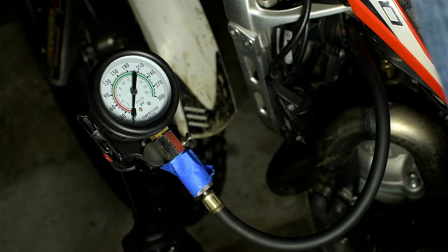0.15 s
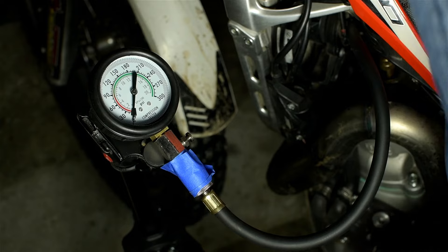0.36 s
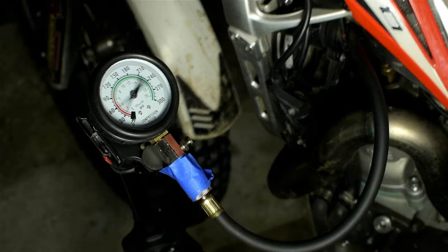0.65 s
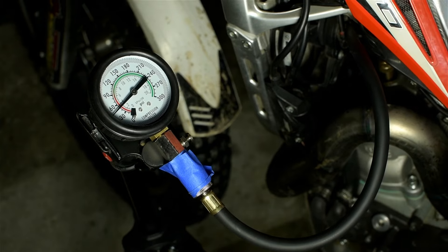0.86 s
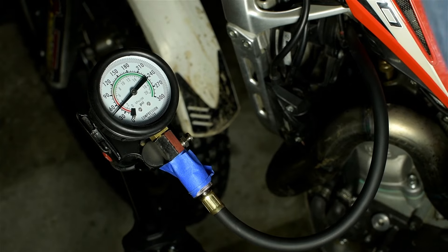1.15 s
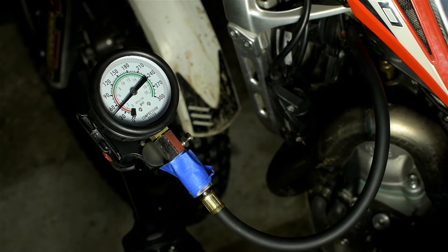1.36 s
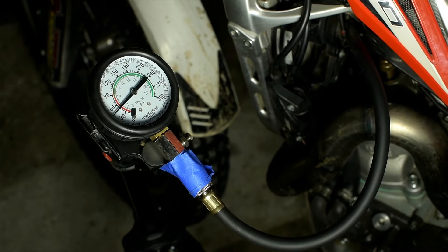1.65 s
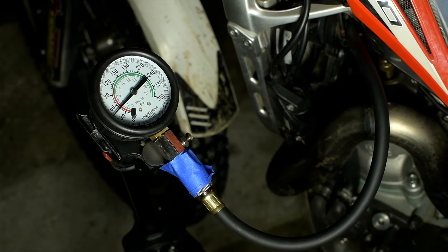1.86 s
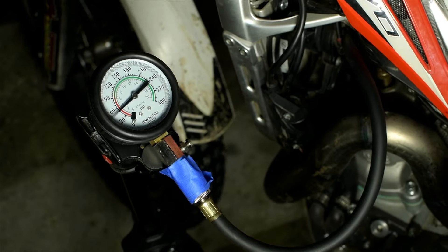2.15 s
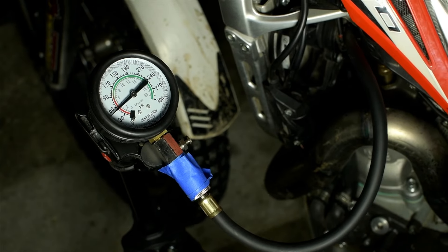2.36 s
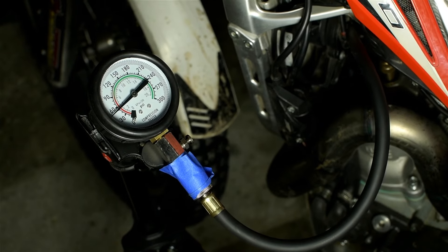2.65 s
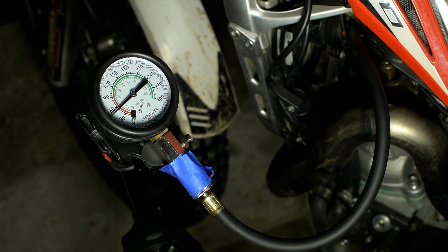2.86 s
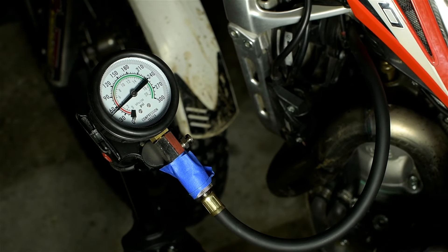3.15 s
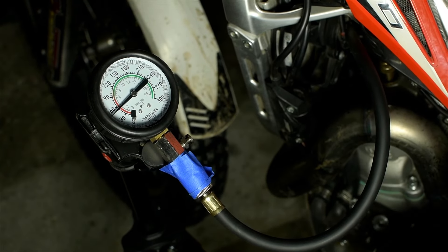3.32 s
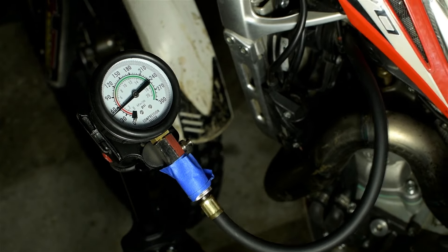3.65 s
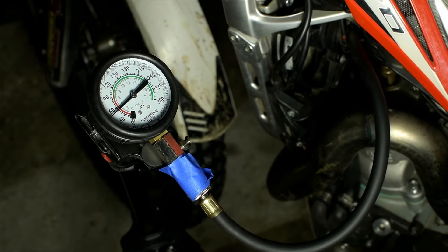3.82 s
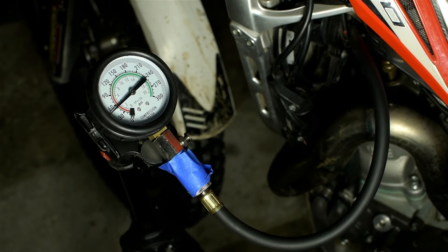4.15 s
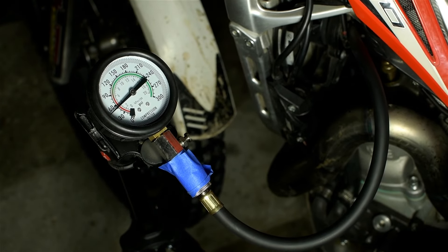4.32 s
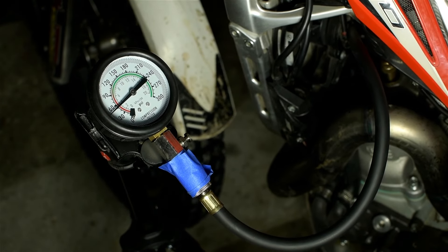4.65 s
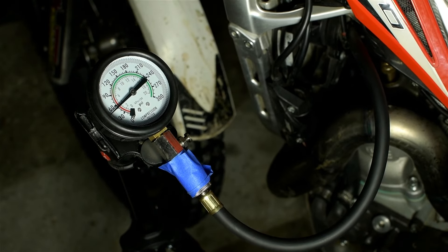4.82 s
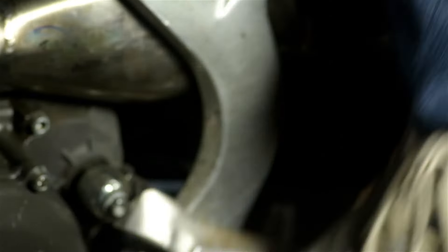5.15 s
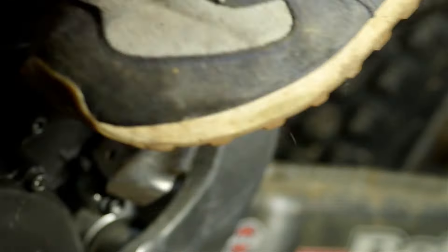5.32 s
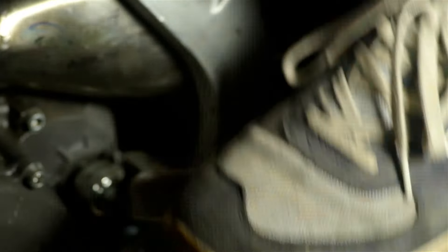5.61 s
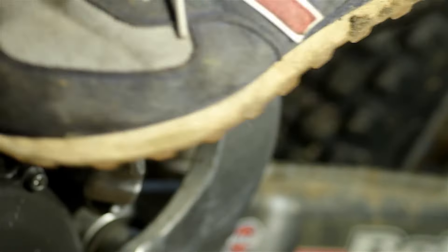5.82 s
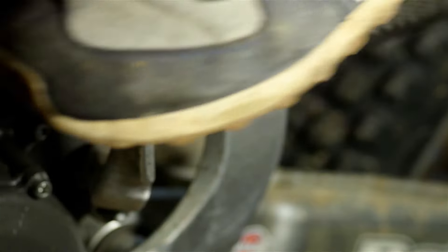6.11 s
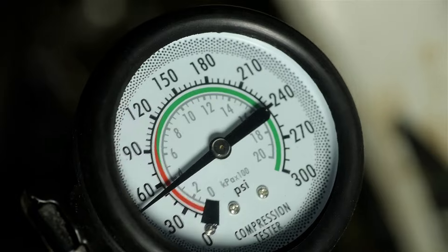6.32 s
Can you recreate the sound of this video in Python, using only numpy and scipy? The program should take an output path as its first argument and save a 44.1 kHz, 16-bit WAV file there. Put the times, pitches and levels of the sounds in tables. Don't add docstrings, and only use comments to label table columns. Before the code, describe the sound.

Kick lever strokes on a small two-stroke with its plug out: clunk, gear whirr, chuffing pipe that slows to sighs, and a rapid run of ratchet teeth easing off. Between the three kicks the frame rings thinly and parts rattle. After about five seconds the action speeds up fourfold, four short zipping bursts with cracks and thumps, spread left and right. Close microphone, short garage reverberation, soft hiss.

```python
import sys
import numpy as np
from scipy import signal
from scipy.fft import rfft, irfft, next_fast_len
from scipy.io import wavfile
from scipy.ndimage import uniform_filter1d

SR = 44100
rng = np.random.default_rng(int(sys.argv[2]) if len(sys.argv) > 2 else 0)


def ratio(d):
    e = np.asarray(d, float) / 20
    return 10 ** e


def bounce(signal):
    frames = np.transpose(np.atleast_2d(signal))
    limited = np.clip(frames, -1, 1)
    pcm = np.round(limited * 32767).astype(np.int16)
    wavfile.write(sys.argv[1], SR, pcm)


N = 285621


def evened(x):
    return x / np.sqrt(np.mean(x ** 2) + 1e-20)


def peaked(x):
    return x / abs(x).max()


def add(mix, s, sound):
    part = mix[round(s * SR):][:len(sound)]
    part += sound[:len(part)]


def read(points, hz):
    f, value = np.transpose(points)
    return np.interp(np.log(hz + 1), np.log(f + 1), value)


def colour(x, spectrum):
    hz = np.fft.rfftfreq(len(x), 1 / SR)
    return irfft(rfft(x) * ratio(read(spectrum, hz)), len(x))


def ring(x, modes, widen=0.81):
    out = np.zeros(len(x))
    for hz, width, db in modes:
        b, a = signal.iirpeak(hz, hz / (width * widen), SR)
        out += ratio(db) * signal.lfilter(b, a, x)
    return out


def shifted(modes, wander):
    by = 1 + wander * rng.uniform(-0.91, 1)
    return [(hz * by, width, db) for hz, width, db in modes]


def levels(tables):
    t, out = np.arange(N) / SR, np.zeros(N)
    for rows in tables:
        s, db = np.array(rows)[:, :2].T
        out += ratio(np.interp(t, s, db, -200, -200))
    return out


def burst(t60, rise=0.00081, size=2000):
    t = np.arange(size) / SR
    shape = ratio(-60 * t / t60) * np.minimum(t / rise, 1)
    noise = rng.standard_normal(size) * shape
    return noise * np.linalg.norm(shape) / np.linalg.norm(noise) / 2


# start_s, peak_db, ping_hz
RETURN_1 = [(0.699, -14.5, 2420), (0.7187, -19.5, 2530), (0.7357, -18, 2870), (0.7537, -20, 2650),
            (0.7732, -17, 2580), (0.7901, -15.5, 3140), (0.806, -17, 2490), (0.824, -15, 2820),
            (0.842, -15.5, 2980), (0.861, -15, 3030), (0.879, -17.5, 3180), (0.9006, -17, 2510),
            (0.9263, -19.5, 2840), (0.95, -19, 2820), (0.9752, -17.5, 2580), (1.0001, -18, 2600),
            (1.0331, -18, 2290), (1.068, -18, 2420), (1.1008, -18.5, 2500)]
RETURN_2 = [(2.2038, -18, 2620), (2.2239, -14, 2470), (2.2399, -18.5, 2420), (2.2568, -16, 2630),
            (2.2727, -19.5, 2310), (2.292, -15.5, 3040), (2.3101, -14, 2500), (2.3262, -17.5, 2500),
            (2.3407, -16, 2560), (2.3559, -16, 2580), (2.3735, -15, 2600), (2.3886, -15.5, 3150),
            (2.4064, -18, 2860), (2.4262, -17, 2600), (2.448, -20, 2500), (2.468, -19.5, 3040),
            (2.49, -17, 3140), (2.5121, -13.5, 3040), (2.5341, -16, 3140), (2.5586, -18, 3050),
            (2.581, -17.5, 2450), (2.6125, -18.5, 3070), (2.6405, -18.5, 2400), (2.6675, -20.5, 3160),
            (2.6963, -19, 2470), (2.7356, -18.5, 2870), (2.7817, -16, 2340)]
RETURN_3 = [(3.757, -18.5, 2440), (3.7764, -19, 2320), (3.7967, -17.5, 2640), (3.8188, -17, 2460),
            (3.8425, -17.5, 2500), (3.8654, -18, 2520), (3.8857, -15, 2750), (3.906, -24, 2480),
            (3.926, -17, 2680), (3.9448, -18.5, 2500), (3.9638, -20, 3330), (3.9841, -17, 2600),
            (4.0068, -20.5, 3000), (4.0334, -20, 2590), (4.0603, -18, 2450), (4.0862, -16.5, 2484),
            (4.116, -17.5, 3050), (4.1647, -16, 2620), (4.2026, -13, 2300)]
# centre_hz, width_hz, level_db
PAWL = [(2600, 290, -4.5), (3170, 190, -2.5), (4920, 390, -9), (7050, 400, -12)]
# centre_hz, width_hz, level_db
CASES = [(920, 74, -5), (1220, 86, 3.5), (1810, 93, 1), (1890, 250, -5.5), (2500, 97, -3.5),
         (3040, 150, -6.5), (3650, 690, -20), (4850, 1600, -3), (6900, 170, -14), (8500, 600, -28)]
# freq_hz, density_db (dB per Hz)
CRACK = [(350, -23.5), (600, -3.5), (1210, -0.5), (1510, -4.5), (1700, 3), (3120, 2.5), (3530, 0),
         (8270, -11.5), (16000, -29)]


def ratchet(rows, gain_db, ping_db):
    hits, pawl = np.zeros(N), np.zeros(N)
    t, ping_s = np.arange(800) / SR, 0.0011
    for s, db, hz in rows:
        tooth = ratio(db + gain_db) * burst(0.025, rise=0.00053)
        modes = shifted(PAWL, .045)
        rebound = ratio(db + gain_db - 9.5) * burst(0.022)
        add(tooth, rng.uniform(.004, .008), rebound)
        add(hits, s, tooth)
        add(pawl, s, ratio(6.0) * ring(ring(tooth, modes), modes))
        swell = t / ping_s * np.exp(1 - t / ping_s)
        add(pawl, s, ratio(db + ping_db) * swell * np.sin(2 * np.pi * hz * t))
    return ratio(2.0) * colour(hits, CRACK) + ratio(-2.0) * ring(hits, CASES) + pawl


# centre_hz, width_hz, level_db
PIPE_LOW = [(116, 40, -9), (166.6, 78, -10.5), (225.4, 47, 3), (288, 81, 3), (335, 70, -1.5)]
PIPE_UP = [(394.5, 44, 0), (462, 23, 2), (492.3, 24, 1.5), (657, 110, -5), (756, 44, -7)]


def puffs(rows, open_s, ragged, pace, lowest=PIPE_LOW):
    low, up, t = np.zeros(N), np.zeros(N), np.arange(4000) / SR
    push = (t / 0.00091) * np.exp(1 - t / 0.00082)
    wave = push - 1.9 * np.roll(push, round(0.00649 / pace * SR))
    for s, db, up_db in rows:
        gas = ragged * (t / open_s) * np.exp(1 - t / open_s) * rng.standard_normal(len(t))
        boom = ring(.5 * wave + gas, lowest, 0.77)
        add(low, s, ratio(db + 1.5) * peaked(boom))
        bark = ring(.5 * push + 1.1 * gas, shifted(PIPE_UP, .035), 0.83)
        late_s = 0.01092 / pace * (up_db < 0)
        add(up, s + late_s, ratio(db + up_db + 3.5) * peaked(bark))
    return ring(low, [(207, 290, 0.0015)]) + ring(up, [(465, 210, 0.036)])


# start_s, one list a kick
TURNS = [
    [0.595, .643, .701, .771, 0.853, .946, 1.085, 1.274],
    [2.162, 2.205, 2.259, 2.314, 2.377, 2.449, 2.535, 2.645, 2.813, 3.025],
    [3.674, 3.719, 3.779, 3.85, 3.936, 4.046, 4.21, 4.421],
]
# start_s, peak_db, upper_modes_db
PUSHES = [
    (.554, -30.5, 1),
    (.589, -18.5, 6),
    (1.523, -37, -5),
    (2.114, -32, 14.5),
    (2.156, -14, -2),
    (3.668, -24, -5.5),
]


def halvings(turns):
    return np.log2(18. * np.diff(turns))


def crank_puffs():
    rows = list(PUSHES)
    for turns in TURNS:
        rows += [(s, -16 - 6.5 * h, -6.5) for s, h in zip(turns[1:], halvings(turns))]
    return rows


# start_s, peak_db, upper_modes_db
SIGHS = [
    (1.843, -63, -7),
    (3.577, -54, 1),
    (4.866, -47.5, 4.5),
]


def sighs():
    return puffs(SIGHS, open_s=0.0084, ragged=1.0, pace=0.88, lowest=PIPE_LOW[2:3])


# start_s, end_s, level_db, pitch_hz
HOOTS = [(1.37, 1.44, -42, 492.3), (1.645, 1.713, -62, 462), (2.082, 2.143, -39.5, 493),
         (2.88, 2.947, -45.5, 496), (3.185, 3.252, -41.5, 500), (3.31, 3.37, -56, 506),
         (3.40, 3.429, -77, 483), (4.30, 4.348, -46.5, 508), (4.56, 4.652, -42.5, 502),
         (4.70, 4.749, -53, 490), (5.045, 5.114, -70.5, 470), (5.48, 5.523, -68.5, 462),
         (5.847, 5.889, -60.5, 460), (5.89, 5.906, -58, 475), (6.27, 6.291, -59.5, 483)]


def hoots(rows):
    out = np.zeros(N)
    for start, end, db, hz in rows:
        u = np.linspace(0, 1, round((end - start) * SR))
        shape = np.sin(.88 * np.pi * u) * np.minimum(12 * (1 - u), 1)
        waver = evened(uniform_filter1d(rng.standard_normal(len(u)), 300))
        phase = 2 * np.pi * hz * np.cumsum(1 + 0.027 * waver) / SR
        add(out, start, ratio(db) * shape * np.sqrt(2) * np.sin(phase))
    return out


# touch_s, meshed_s, easing_s, free_s, whirr_db
KICKS = [
    (0.52, 0.563, 1.1, 0.93, -36),
    (2.097, 2.129, 2.6, 2.8, -36.5),
    (3.63, 3.708, 4.06, 4.23, -36.5),
]
# after_free_s, fall_db
COAST = [(.1, -13), (.2, -27), (.35, -55)]


def gear_whirr():
    curves = []
    for (touch, meshed, easing, free, db), swing in zip(KICKS, (RETURN_1, RETURN_2, RETURN_3)):
        back, driven_db = swing[0][0], db - 2
        curve = [(touch, db - 18.5), (meshed, driven_db), (back, driven_db), (back + 0.013, db)]
        curve += [(easing, db), (free, db - 2.5)]
        curves.append(curve + [(free + s, db + fall_db) for s, fall_db in COAST])
    return curves


def crank_rumble():
    curves = []
    for turns, stop_db in zip(TURNS, (-30.5, -45, -39.5)):
        db, at = -31.5 - 10 * halvings(turns), np.array(turns[1:])
        swell = (at[0] - .1, db[0] - 29.5)
        dips = zip(at[:-1] + 0.8 * np.diff(at), db[1:] - 5)
        stop = (turns[-1] + 0.33, db[-1] + stop_db)
        curves.append(sorted([swell, *zip(at + .012, db), *dips, stop]))
    return curves


# freq_hz, density_db (dB per Hz)
WHIRR = [(290, -46), (500, -2), (595, -7), (1210, -6), (1530, -5), (1740, -5), (3110, -4.5), (3540, -8),
         (4870, -14), (8330, -21.5), (16000, -37)]
RUMBLE = [(18, -61.5), (30, -45.5), (79, -4.5), (140, 11), (233, -9.5), (284, -7), (389, -4), (461, 4.5),
          (555, -8), (596, -29), (900, -7.5), (1170, -28), (1980, -120)]


def turning(whirr_db, rumble_db, ticks_per_s, tick_db):
    ticks = (rng.random(N) < ticks_per_s / SR) * ratio(tick_db * np.minimum(rng.exponential(1, N), 4))
    tick_fade = ratio(-60 * np.arange(900) / SR / 0.002)
    chatter = rng.standard_normal(N) * (1 + signal.oaconvolve(ticks, tick_fade)[:N])
    whirr = evened(evened(colour(chatter, WHIRR)) + 0.2 * evened(ring(chatter, CASES, 0.79)))
    effort = levels(whirr_db)
    brightness = (effort / effort.max()) ** 2.2
    dull = signal.filtfilt(*signal.butter(3, 5600, fs=SR), whirr)
    dark = signal.filtfilt(*signal.butter(3, 3300, fs=SR), whirr)
    dull = dark + brightness ** 0.3 * (dull - dark)
    whirr = dull + 1.34 * brightness * (whirr - dull)
    air = rng.standard_normal(N)
    rumble = evened(evened(colour(air, RUMBLE)) + 0.39 * evened(ring(air, PIPE_LOW + PIPE_UP, 0.91)))
    return ratio(-3.0) * whirr * effort + ratio(0.5) * rumble * levels(rumble_db)


# centre_hz, width_hz, level_db
LEVER = [(1770, 28, -3.5), (1990, 64, -4.5), (2496, 36, -1), (3170, 45, -13.5), (4040, 30, -9.5)]
LEVER_BODY = [(770, 110, 4), (876, 98, -1), (1044, 390, -17), (640, 1000, 3)]


def knocks(rows):
    out, size = np.zeros(N), 6000
    fade = np.hanning(2 * size)[size:]
    bright = signal.butter(2, [3800, 9000], "band", fs=SR)
    soft = signal.butter(3, 4600, fs=SR)
    for s, db, hz, t60, bright_db, width, cases, dull_db in rows:
        strike = burst(max(t60, .004), rise=0.00098, size=size)
        tone = peaked(ring(ring(strike, [(hz, width, 0)]), [(hz, 2.0 * width, 0)]))
        tone += 0.13 * peaked(ring(ring(strike, LEVER), [(2400, 2200, 0)]))
        shake = burst(0.52 * t60, rise=0.0035, size=size)
        tone += cases * peaked(ring(ring(shake, CASES[1:8]), [(2600, 3000, 0)]))
        tone = signal.lfilter(*soft, signal.lfilter(*soft, tone))
        crack = burst(t60, rise=0.0012, size=size)
        crack = signal.lfilter(*bright, signal.lfilter(*bright, crack))
        tone += ratio(bright_db - 3) * peaked(crack)
        dull = ring(burst(1.9 * t60, rise=0.00059, size=size), LEVER_BODY)
        dull = ring(ring(dull, [(920, 2000, 0)]), [(1000, 2500, 0)])
        add(out, s, ratio(db) * fade * (tone + ratio(dull_db - 0.5) * peaked(dull)))
    return out


def blows(rows, kind):
    t60, bright_db, width, cases = kind
    return [(s, db, hz, t60, bright_db + sum(extra_db), width, cases, dull_db)
            for s, db, hz, dull_db, *extra_db in rows]


# t60_s, crack_db, ring_width_hz, cases_gain
KNOCK = (0.1, -49, 380, 0.47)
CLACK = (0.08, -4, 798, 0.72)
# start_s, peak_db, ring_hz, dull_db
PADDED = [
    (1.2362, -37.5, 1960, -0.5),
    (1.237, -39, 2400, -28),
    (2.1175, -29.5, 2280, 6.5),
    (2.9867, -41, 1150, 4.5),
    (3.4057, -58.5, 2030, -5),
    (3.6547, -32, 2140, 3),
    (3.736, -20.5, 2400, -3.5),
    (4.3878, -35.5, 1875, -6),
]
# start_s, peak_db, ring_hz, dull_db, extra_bright_db
CLACKS = [
    (.531, -65, 1500, 17, -20.5),
    (.538, -41, 2270, -11, 4),
    (.5536, -17.5, 2500, -5, 2.5),
    (.5898, -20, 2120, -8, -16),
    (1.946, -55, 2210, -9.5, -23),
    (1.9668, -42.5, 2600, -9.5, 3.5),
    (3.1452, -35.5, 1940, -0.5, -4.5),
    (5.1203, -72, 2020, -4.5, 14),
]


def lever_blows():
    return knocks(blows(PADDED, KNOCK) + blows(CLACKS, CLACK))


# start_s, peak_db, dull_db, ring_hz
CLINKS = [(1.3098, -34.5, -13, 2480), (1.393, -51.5, 5, 2450), (1.478, -38, -7, 2450),
          (1.6346, -47.5, -6.5, 2460), (2.1426, -31, 8.5, 2400), (3.027, -45.5, -10, 2450),
          (3.0866, -45.5, -20, 2400), (3.3027, -41.5, -16, 2453), (4.461, -41.5, -11.5, 2450),
          (4.4848, -40.5, -19, 2440), (4.693, -39.5, -7, 2500), (4.6935, -41.5, -20, 1960),
          (5.0333, -45, -30, 2430)]
# t60_s, crack_db, ring_width_hz, cases_gain
CLINK = (.02, -70., 240, 0.)


def spring_clinks():
    taps = knocks(blows([(s, db, hz, dull_db) for s, db, dull_db, hz in CLINKS], CLINK))
    return signal.sosfilt(signal.butter(6, 3000, fs=SR, output="sos"), taps) + frame()


# centre_hz, width_hz, level_db
FRAME = [(905, 14, 6), (1040, 12, 3.5), (1460, 16, 1), (1790, 16, -4), (1910, 16, -0.5), (2040, 29, -6),
         (2365, 20, -6.5), (2500, 20, -5.5), (3900, 16, -15)]


def frame():
    out = np.zeros(N)
    for s, db, *_ in CLINKS:
        strike = burst(.02, rise=.003, size=8000)
        modes = [(hz, width, mode_db + 4 * rng.standard_normal())
                 for hz, width, mode_db in shifted(FRAME, .006)]
        lines = ring(ring(strike, modes, 1.2), [(hz, 5 * width, 0) for hz, width, _ in modes])
        add(out, s, ratio(db - 8) * peaked(lines))
    return out


# start_s, peak_db, centre_hz, scatter_t60_s, top_hz
RATTLES = [(.490, -42, 870, 0.033, 1280), (0.67, -58, 2900, 0.05, 1900), (.531, -54, 5030, .1, 12000),
           (0.558, -21.5, 2600, 0.11, 8980), (1.275, -42, 2500, .03, 3000),
           (1.482, -45.5, 1110, 0.11, 2045), (1.718, -50, 2700, 0.053, 4700),
           (1.734, -47, 2600, 0.14, 4950), (1.968, -38.5, 2700, 0.16, 7400),
           (1.9685, -51.5, 686, 0.13, 1390), (3.147, -35.5, 3460, 0.16, 6500),
           (3.148, -40, 731.5, 0.12, 1620), (3.304, -46.5, 2320, 0.14, 4540),
           (3.406, -58.5, 935, 0.13, 1185), (3.5765, -33.5, 2130, 0.14, 2730),
           (3.578, -40, 736, 0.12, 1310), (3.583, -60, 3700, .3, 4300), (4.695, -48.5, 1956, 0.11, 3454),
           (4.797, -51, 2600, 0.038, 5370), (4.8024, -41, 2650, 0.18, 5100), (4.817, -49, 3000, 0.08, 4500),
           (4.83, -47, 2400, 0.083, 3970), (4.8565, -51, 2400, 0.026, 5900),
           (4.8607, -33.5, 1930, 0.12, 4920), (4.866, -39, 864, 0.094, 2160)]


def rattles():
    out, size = np.zeros(N), 6000
    for s, db, hz, t60, top_hz in RATTLES:
        band = signal.butter(5, [.55 * hz, top_hz], "band", fs=SR, output="sos")
        clumps = ratio(8.9 * uniform_filter1d(rng.standard_normal(size), 40))
        grit = burst(max(t60, .01), rise=0.0033, size=size) * clumps
        shake = burst(0.013, size=size) + 0.25 * grit
        parts = ring(shake, [(hz, .4 * hz, 0), (3600, 700, -12), (5300, 1200, -13)])
        add(out, s, ratio(db) * peaked(signal.sosfilt(band, parts)))
    return out


# blow_s, let_go_s, rattle_db, thump_db, rumble_db
HURRIED = [
    (5.155, 5.302, -32.5, -21, -48),
    (5.559, 5.705, -31, -25.5, -45),
    (5.961, 6.093, -30.5, -24.5, -48.5),
    (6.142, 6.152, -36, -37.5, -66),
    (6.342, 6.47, -31, -28, -42),
]
# after_let_go_s, fall_db
RATTLE_TAIL = [(0.029, -19), (.09, -62), (.22, -65)]
RUMBLE_TAIL = [(.08, -12), (.22, -40)]


def hurried_levels():
    lead_s, lead_db, grip_s, thump_s, sag_db = 0.016, -17.5, 0.019, 0.049, -1.5
    rattle, rumble = [], []
    for s, end, db, thump_db, low_db in HURRIED:
        held = [(s - lead_s, db + lead_db), (s, db + lead_db), (s + grip_s, db), (end, db + sag_db)]
        rattle.append(held + [(end + t, db + sag_db + fall_db) for t, fall_db in RATTLE_TAIL])
        thump = [(s - lead_s / 4, low_db), (s, thump_db), (min(s + thump_s, end), low_db), (end, low_db)]
        rumble.append(thump + [(end + t, low_db + fall_db) for t, fall_db in RUMBLE_TAIL])
    return rattle, rumble


def teeth_blur(rattle):
    low_hz, high_hz, rise_s, width_hz, sag_hz_per_s, fade_db_per_s = 2450, 3027, .06, 420, 2700, -29
    t = np.arange(N) / SR
    starts = [row[0] for row in HURRIED]
    since = t - np.array([0] + starts)[np.searchsorted(starts, t)]
    hz = low_hz + (high_hz - low_hz) * np.minimum(since / rise_s, 1)
    hz = hz - sag_hz_per_s * np.clip(since - rise_s, 0, .2)
    slow = signal.lfilter(*signal.butter(2, width_hz / 2, fs=SR), rng.standard_normal((2, N)))
    turn = 2 * np.pi * np.cumsum(hz) / SR
    band = evened(slow[0] * np.cos(turn) + slow[1] * np.sin(turn))
    return band * levels(rattle) * ratio(-7.5 + fade_db_per_s * np.minimum(since, .3))


# start_s, peak_db
FAST_TEETH = [(5.195, -20), (5.2054, -17.5), (5.2249, -21), (5.235, -18.5), (5.6046, -22), (5.6106, -17.5),
              (5.6228, -16), (5.6442, -23), (6.055, -19), (6.077, -21), (6.3637, -20), (6.4547, -27)]


def stray_teeth():
    return ratchet([(s, db, 3027) for s, db in FAST_TEETH], -3.5, -9.5)


def jingle():
    level_db, last_s, ticks_per_s = -60, 0.16, 30
    ticks = (rng.random(N) < ticks_per_s / SR) * rng.standard_normal(N)
    after = [[(end, level_db), (end + last_s / 2, level_db), (end + last_s, level_db - 30)]
             for _, end, *_ in HURRIED[:3]]
    metal = ring(ticks, LEVER[:3] + [(920, 33, 3.8)], 0.91)
    tinkle = evened(ring(metal, [(1700, 5500, 0)]))
    return signal.lfilter(*signal.butter(4, 3600, fs=SR), tinkle) * levels(after)


# start_s, peak_db, upper_modes_db
FAST_PUFFS = [(5.158, -18.5, 2.5), (5.164, -32, 17.5), (5.216, -31.5, -22), (5.243, -28.5, -23),
              (5.554, -32.5, 13), (5.571, -24, -6), (5.591, -28, -17.5), (5.611, -25.5, -22),
              (5.663, -25, -20.5), (5.734, -38, -1), (5.963, -14, -6), (5.98, -12, -5.5),
              (5.995, -11.5, -21), (6.012, -12.5, -13), (6.024, -15.5, -30), (6.068, -18.5, -14.5),
              (6.139, -26.5, -11), (6.202, -33, -6), (6.346, -13.5, 5), (6.351, -31.5, 10.5),
              (6.357, -13.5, -1), (6.386, -17.5, -27), (6.407, -26, -2), (6.439, -28.5, -19)]
# start_s, end_s, level_db, pitch_hz
HUMS = [
    (5.355, 5.40, -59, 920),
    (5.45, 5.50, -72, 927),
    (5.735, 5.756, -40.5, 900),
    (5.85, 5.885, -67, 904),
    (5.885, 5.93, -69, 923),
]
# start_s, peak_db, ring_hz, dull_db
FAST_PADDED = [(5.1532, -26, 2340, -6), (5.3576, -54, 2380, 6.5), (5.364, -47, 1850, -10),
               (5.3936, -52, 1610, 0), (5.397, -52, 2600, -10), (5.414, -51.5, 2520, -2),
               (5.415, -55, 1870, -10), (5.4455, -54.5, 2600, -2), (5.454, -59, 3450, -20),
               (5.5579, -28.5, 2260, 5), (5.791, -49, 2600, 4), (5.8082, -47.5, 1950, -8),
               (5.809, -52, 2500, -6), (5.834, -56, 2450, -16), (5.858, -63, 2500, -2),
               (5.8865, -58, 1910, 0), (5.9633, -28, 2260, -17), (6.198, -53, 1990, -13),
               (6.234, -65, 2450, -14)]
# start_s, peak_db, ring_hz, dull_db
FAST_CLACKS = [
    (5.1607, -33, 2600, 9),
    (5.5783, -32, 2740, 6.5),
    (5.7369, -34, 1900, -5),
    (5.954, -36.5, 2600, 5.5),
    (5.996, -26.5, 2600, -25),
    (6.1419, -37.5, 2320, -1),
    (6.3215, -53.5, 1650, 15.5),
    (6.3456, -28, 2520, 5),
]


def hurried():
    rattle, rumble = hurried_levels()
    pipe = 0.54 * puffs(FAST_PUFFS, open_s=0.0027, ragged=.6, pace=4.) + hoots(HUMS)
    hits = knocks(blows(FAST_PADDED, KNOCK) + blows(FAST_CLACKS, CLACK))
    gears = turning(rattle, rumble, 220.0, 0.89) + teeth_blur(rattle) + stray_teeth()
    return garage(pipe + hits + gears + jingle(), pace=1.64, wet_db=-13.5)


# start_s, peak_db
SPIKES = [
    (5.1636, -5.5),
    (5.5805, -6),
    (5.998, -6),
    (6.3306, -33),
]


def spikes():
    out, u = np.zeros(N), np.arange(60) / 4.4
    for s, db in SPIKES:
        add(out, s, ratio(db + 8.5) * u * (1 - 0.27 * u) * np.exp(-u))
    return uniform_filter1d(out, size=4)


# start_s, side_db
BASS_WIDTH = [
    (5.099, 7.5),
    (5.954, 2),
    (5.97, -57),
    (6.11, -32),
    (6.13, -4.5),
    (6.48, 14.5),
]
# freq_hz, side_minus_mid_db
SPREAD = [(60, -15), (110, -10.5), (200, -4.5), (380, -11.5), (700, -10), (1290, -6), (2380, -3),
          (4400, -1.5), (8120, 1), (15000, 0)]


def hurried_side():
    turned = signal.hilbert(hurried(), next_fast_len(N)).imag[:N]
    x = colour(turned, SPREAD)
    bass = signal.filtfilt(*signal.butter(3, 950, fs=SR), x)
    s, db = np.transpose(BASS_WIDTH)
    return x - bass + bass * ratio(np.interp(np.arange(N) / SR, s, db))


# freq_hz, t60_s
GARAGE = [(100, 0.48), (500, 0.53), (2000, 0.3), (5000, 0.39), (8000, 0.3), (14000, 0.24)]


def garage(x, pace, wet_db):
    taps = np.zeros(SR)
    at = np.arange(200, SR - 20, 20) + rng.integers(0, 20, (SR - 201) // 20)
    taps[at] = rng.choice([-1., 1.], len(at))
    hz, t, z = signal.stft(taps, SR, nperseg=256)
    decay = ratio(-60 * pace * t / read(GARAGE, hz)[:, None])
    tail = signal.istft(z * decay, SR, nperseg=256)[1]
    return x + ratio(wet_db) * signal.fftconvolve(x, tail / np.linalg.norm(tail))[:N]


# freq_hz, density_db (dB per Hz)
AIR = [(24, -62), (40, -31.5), (113, -5), (153, -2), (329, -1), (2920, -10), (3650, -8), (3930, -14.5),
       (10600, -18.5), (15000, -35)]


def still_air():
    fade_db = np.interp(np.arange(N) / SR, [0, .112, .118, .3, .45], [-4.5, -5.5, 5.0, 0.0, 3.5])
    return ratio(-82) * ratio(fade_db) * evened(colour(rng.standard_normal(N), AIR))


def scene():
    clinks, loose = spring_clinks(), rattles()
    clink_dry, rattle_dry = .55, .45
    teeth = ratchet(RETURN_1 + RETURN_2 + RETURN_3, 2.5, -8)
    hits = (1 - clink_dry) * clinks + lever_blows() + (1 - rattle_dry) * loose
    metal = teeth + hits + turning(gear_whirr(), crank_rumble(), 400., 1.0)
    pipe = puffs(crank_puffs(), open_s=0.0076, ragged=0.33, pace=0.97) + sighs() + hoots(HOOTS)
    mid = garage(metal + .4 * pipe, pace=0.83, wet_db=-5.0) + .65 * pipe
    mid += clink_dry * clinks + 1.32 * rattle_dry * loose
    mid += hurried() + spikes() + still_air()
    side = ratio(-4.0) * hurried_side() + ratio(-4.5) * still_air()
    return np.array([mid + side, mid - side])


def roll_off(x):
    return signal.sosfilt(signal.butter(12, 16670, fs=SR, output="sos"), x)


def record(dry):
    bass_cut = signal.butter(6, 76, "high", fs=SR, output="sos")
    top_cut = signal.firwin(255, 16100, fs=SR)
    heard = signal.oaconvolve(signal.sosfilt(bass_cut, dry), top_cut[None], "same")
    return roll_off(heard)


dry = scene()
out = record(dry)
bounce(out)
```